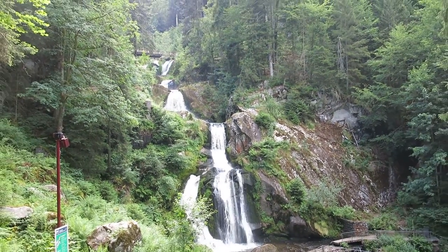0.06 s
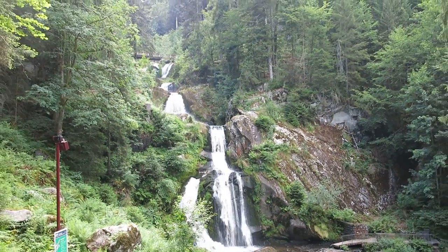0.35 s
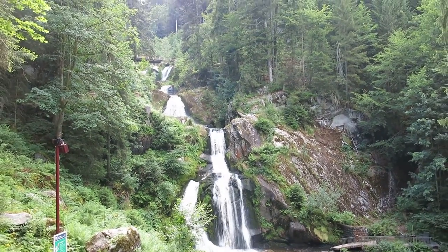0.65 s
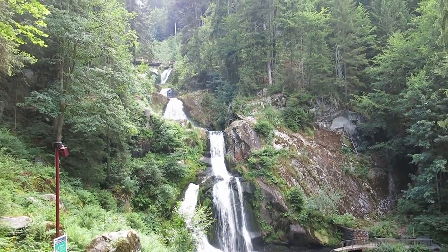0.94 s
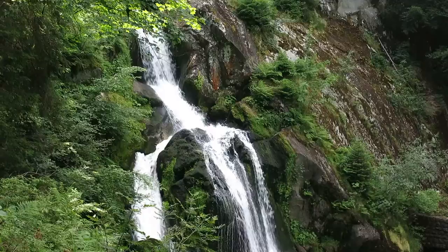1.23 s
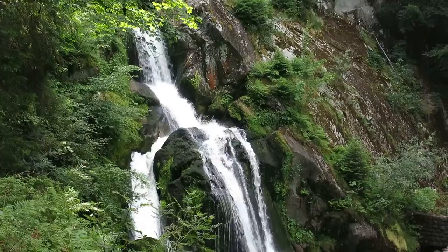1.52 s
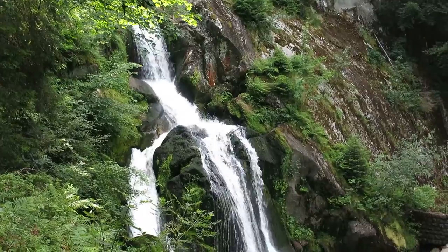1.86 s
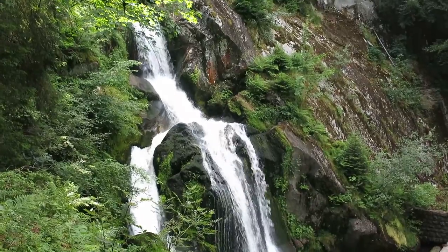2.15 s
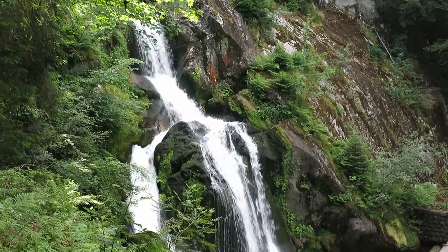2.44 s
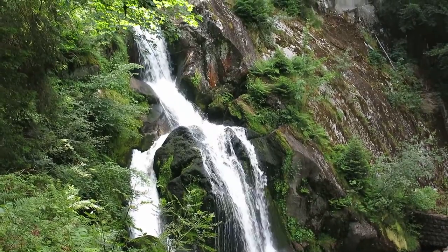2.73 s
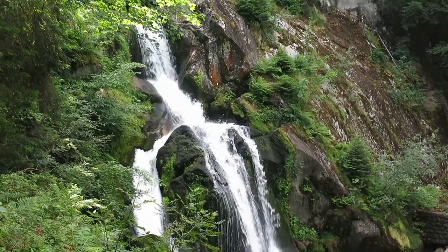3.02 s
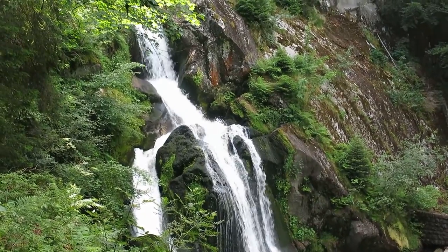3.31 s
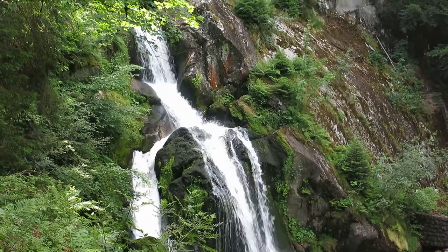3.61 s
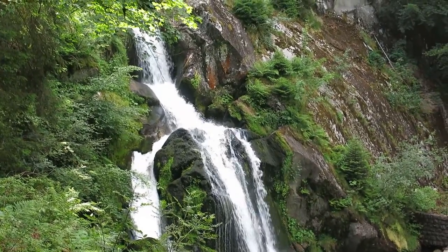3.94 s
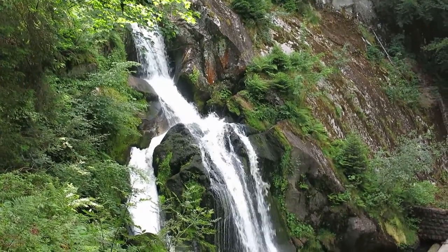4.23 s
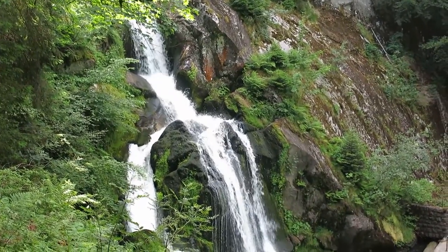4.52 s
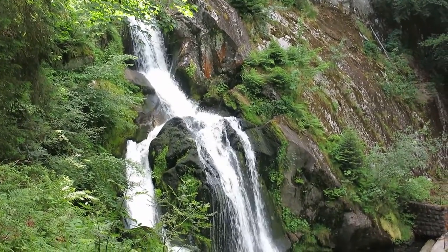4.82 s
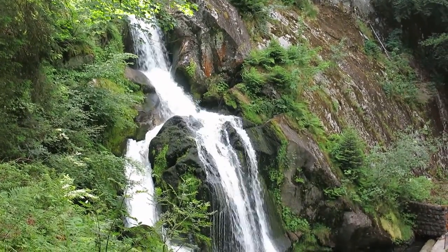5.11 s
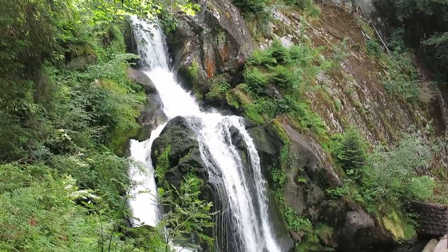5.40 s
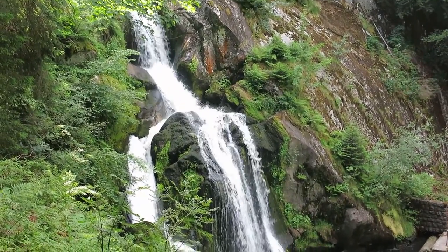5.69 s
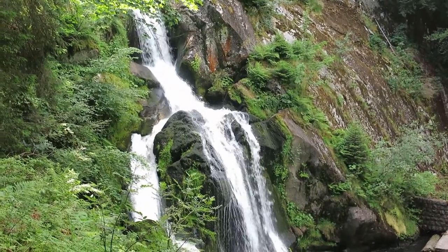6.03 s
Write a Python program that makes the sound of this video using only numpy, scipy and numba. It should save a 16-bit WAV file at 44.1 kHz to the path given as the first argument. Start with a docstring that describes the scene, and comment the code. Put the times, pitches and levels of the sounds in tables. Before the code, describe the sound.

Steady rush of a forest waterfall, with two tiny chirps around a microphone knock, cutting out briefly and resuming louder and brighter.

```python
"""Forest waterfall across its pool

Countless splashes from a tall fall add incoherently to a rush that surges a little, coloured by the rocks.
A hand-held stereo camera hears it in two shots, a short silence between, the second louder and brighter.
In the first, a knock rings the camera's shell and makes the gain control duck;
a short peep comes before the knock and a thin chirp after."""
import sys
import numpy as np
from scipy import signal
from scipy.fft import rfft, irfft
from scipy.io import wavfile
from scipy.ndimage import uniform_filter1d
from numba import njit

SR = 44100
rng = np.random.default_rng(int(sys.argv[2]) if len(sys.argv) > 2 else 0)


def store_wav(level_fs):
    """Save 16-bit WAV to argv[1]."""
    pcm = np.round(np.clip(np.atleast_2d(level_fs), -1, 1) * 32767)
    wavfile.write(sys.argv[1], SR, pcm.T.astype(np.int16))


N = 267246
TIME = np.arange(N) / SR
FREQ = np.arange(N // 2 + 1) * SR / N


def undb(db):
    """Amplitude ratio of a level in decibels."""
    return 10 ** (np.asarray(db) / 20)


def unit(x):
    """Normalisation to rms 1."""
    return x / np.sqrt(np.mean(x ** 2))


def across(points):
    """Interpolation of (f/Hz, value) points over the spectrum, on a log-frequency axis."""
    hz, value = np.transpose(points)
    return np.interp(np.log(FREQ + 1), np.log(hz + 1), value)


def wander(rate_hz):
    """Band-limited fluctuation of rms 1: straight lines join random values drawn at rate_hz."""
    knots = rng.standard_normal(4096)
    return unit(np.interp(TIME * rate_hz, np.arange(len(knots)), knots))


def gate(start, end):
    """Rectangular time window with briefly tapered edges."""
    return uniform_filter1d(1. * ((TIME >= start) & (TIME < end)), size=64)


# the peep and the chirp: t/s, length/s, top f/Hz, fall/share of f, level/dB, attack/s, waver/share of f
WHISTLED_NOTES = [(.204, .035, 1410, .13, -17.5, .009, .04), (.433, .127, 3010, .43, -20, .064, .006)]

def whistle(start, length, top_hz, fall, db, attack, waver):
    """Frequency modulation: a nearly pure tone swells and fades as it lifts, then drops ever faster."""
    apex, bend_power, ends_db = .33, 2.4, -12
    age = TIME - start
    progress = np.clip(age / length, 0, 1)
    arch = 1 - fall * np.abs((progress - apex) / (1 - apex)) ** bend_power
    pitch = top_hz * arch * (1 + waver * wander(rate_hz=300))
    contour_db = np.interp(age, [0, attack, length], [ends_db, 0, ends_db])
    envelope = undb(db + contour_db) * gate(start, start + length)
    return np.sqrt(2) * envelope * np.sin(2 * np.pi * np.cumsum(pitch) / SR)


# modes of the camera's shell: f/Hz, left level/dB, right level/dB, T60/s
SHELL_MODES = [(1950, -9.5, 12, 0.01), (3700, -16.5, 6.5, 0.0082), (7900, -6, 9.5, 0.005)]

def knock(start, crack_db, crack_s, rise_s):
    """Impact excitation: a tap near the right microphone cracks and rings the shell's damped modes."""
    age = np.maximum(TIME - start, 0)
    ring = sum(undb([[left], [right]]) * np.sin(2 * np.pi * hz * age) * undb(-60 * age / t60)
               for hz, left, right, t60 in SHELL_MODES)
    bright_noise = unit(np.diff(rng.standard_normal(N + 1)))
    crack = undb(crack_db) * bright_noise * np.exp(-age / crack_s)
    contact_rise = 1 - np.exp(-age / rise_s)
    return (ring + crack) * contact_rise


def splashes(per_s, spread_db, foam_db):
    """Shot noise: dense drop impacts of unequal size merge with the smooth hiss of bursting foam."""
    hits = rng.random(N) < per_s / SR
    drops = hits * rng.standard_normal(N) * undb(spread_db * rng.standard_normal(N))
    return unit(drops) + undb(foam_db) * rng.standard_normal(N)


# slow swell of the bass in the second shot, taken about its mean: t/s, level/dB
BASS_SWELL = [(1.45, -36.5), (2.0, -36), (2.45, -34.5), (3.15, -35.5), (4.3, -42.5), (5.0, -39), (5.7, -40)]

def falling_water(surge_db, flicker_db, thud_db):
    """Amplitude modulation: spectra of two splash sheets whose octaves surge together and flicker alone."""
    sheets = rfft([splashes(per_s=16000, spread_db=1.0, foam_db=4) for _ in range(2)])
    surge = surge_db * wander(rate_hz=7.7)
    times, bass_db = np.transpose(BASS_SWELL)
    swell = np.interp(TIME, times, bass_db - bass_db.mean(), left=0)
    octaves = np.log2(np.clip(FREQ, 62.5, 16000) / 62.5)
    water = 0
    for octave in range(9):
        band = irfft(sheets * np.maximum(1 - np.abs(octaves - octave), 0), N)
        # the bass comes from a few big slugs of water, so it is less even than the spray
        bulk = 1 / (1 + octave ** 2)
        flicker = (flicker_db + bulk * thud_db) * wander(rate_hz=16)
        water = water + band * undb(surge + bulk * swell + flicker)
    return rfft(water)


# likeness of the two microphone signals: f/Hz, coherence (0 to 1)
PAIR_COHERENCE = [(100, 1), (180, .998), (300, .98), (640, .91), (1410, .82), (3100, .91), (6820, .75),
                  (10000, .72), (15000, .5)]
# left microphone relative to right: f/Hz, level/dB
PAIR_BALANCE = [(200, 0), (380, .6), (550, 2.1), (1200, 1), (2100, -.8), (6000, -.3), (9800, -3.2),
                (11500, 0), (13300, 5.5), (15500, 4.5)]
# lead of left over right: f/Hz, phase/rad
PAIR_PHASE = [(200, 0), (520, .15), (1030, -.3), (2400, -.05), (5250, .2), (9560, .45), (11800, 1.3),
              (15300, .3)]

def microphone_pair(water):
    """Partial coherence: the sum and difference of two independent spectra give left and right."""
    coherence = across(PAIR_COHERENCE)
    sides = np.array([[1], [-1]])
    pair = np.sqrt(1 + coherence) * water[0] + sides * np.sqrt(1 - coherence) * water[1]
    balance = undb(sides * across(PAIR_BALANCE) / 2)
    return pair * balance * np.exp(.5j * sides * across(PAIR_PHASE))


# spectral density of the rush in each shot: f/Hz, relative level/dB
FIRST_SPECTRUM = [(25, -36), (45, -21), (70, -9), (100, -13.5), (150, -0.5), (220, 1), (500, -11),
                  (1100, -9.5), (2400, -14), (3100, -17), (4500, -14.5), (7000, -15.5), (10000, -19.5),
                  (15700, -43)]
SECOND_SPECTRUM = [(25, -48), (45, -16.5), (70, -9.5), (180, 0.0), (320, -3), (1000, -6.5), (3000, -9.5),
                   (7000, -10.5), (9500, -12.5), (12000, -19.0), (15700, -30)]
# bands that reflections from rock and ground reinforce: f/Hz, width/Hz, gain/dB
FIRST_ROCK_BANDS = [(690, 490, 7), (1550, 420, 4.5), (2240, 600, 1.5), (3870, 430, 1.5)]
SECOND_ROCK_BANDS = [(430, 75, 4), (714, 415, 5), (1250, 195, 4.2), (1510, 360, 3.7), (2105, 460, 3.2),
                     (3700, 190, 1.9)]

def waterfall(water, spectrum, rock_bands, echo_s, echo_db):
    """Interference: reflections from the surroundings colour the rush, returned in stereo at rms 1."""
    rocks_db = sum(db * np.exp(-(2 * (FREQ - hz) / width) ** 2) for hz, width, db in rock_bands)
    colour = undb(across(spectrum) + rocks_db)
    # a surface close by adds a faint early reflection that ripples the treble
    reflection = undb(echo_db) * across([(1500, 0), (3500, 0.6)])
    comb = 1 + reflection * np.exp(-2j * np.pi * FREQ * echo_s)
    return unit(irfft(microphone_pair(water) * colour * comb, N))


def scene():
    """Superposition: the fall sounds in both shots, the whistled notes and the knock in the first."""
    water = falling_water(surge_db=0.19, flicker_db=0.17, thud_db=3.5)
    first = undb(-19.5) * waterfall(water, FIRST_SPECTRUM, FIRST_ROCK_BANDS, echo_s=.0012, echo_db=-23)
    second = undb(-18) * waterfall(water, SECOND_SPECTRUM, SECOND_ROCK_BANDS, echo_s=.00159, echo_db=-24)
    tap = knock(start=.3943, crack_db=-8, crack_s=.0013, rise_s=.0003)
    notes = sum(whistle(*note) for note in WHISTLED_NOTES)
    return (first + tap + notes) * gate(0, 1.1055) + second * gate(1.408, 7)


@njit
def follow_peaks(x, attack, release):
    """Envelope detection: one-pole smoothing with separate rates of rise and fall."""
    envelope, held = np.empty(len(x)), 0.
    for i in range(len(x)):
        held += (x[i] - held) * (attack if x[i] > held else release)
        envelope[i] = held
    return envelope


def gain_control(x, ceiling_db, attack_s, release_s):
    """Limiting: both channels duck when the peak envelope passes the ceiling, then recover slowly."""
    peaks = follow_peaks(np.abs(x).max(axis=0), 1 / (attack_s * SR), 1 / (release_s * SR))
    return x / np.maximum(peaks / undb(ceiling_db), 1)


def record(dry):
    """Finite range and bandwidth: the camera rides its gain, clips at full scale and cuts the top."""
    limited = gain_control(dry, ceiling_db=-5.0, attack_s=0.0008, release_s=0.47)
    lowpass = signal.ellip(10, .05, 60, 15800, fs=SR, output="sos")
    return signal.sosfiltfilt(lowpass, np.clip(limited, -1, 1))


dry = scene()
out = record(dry)
store_wav(out)
```